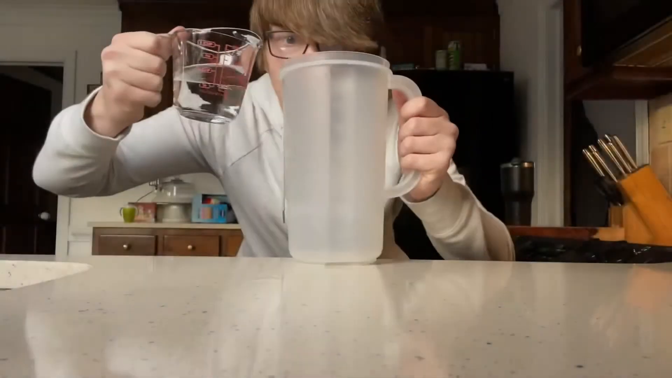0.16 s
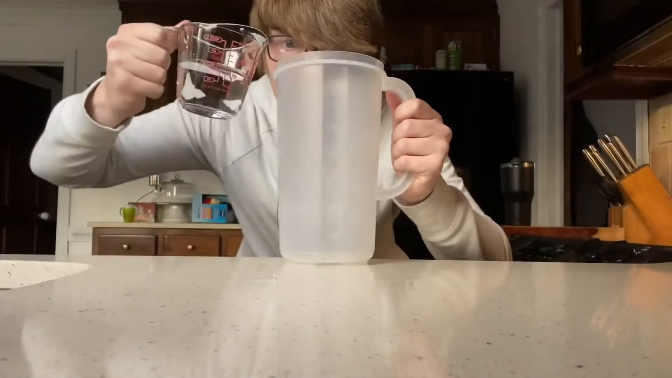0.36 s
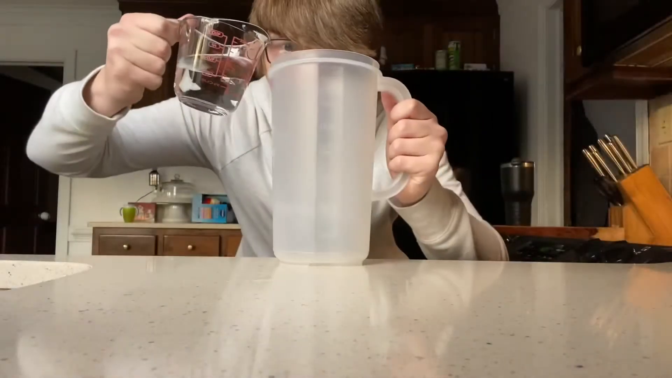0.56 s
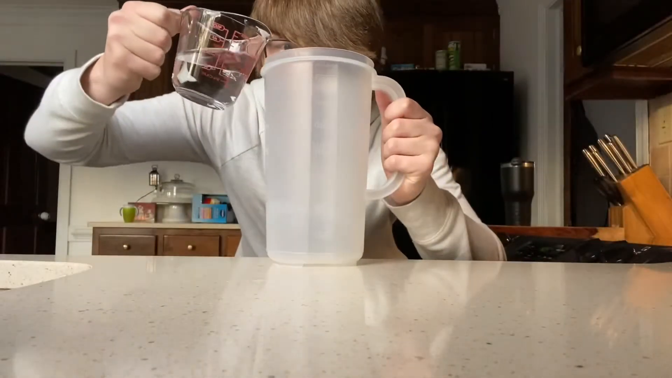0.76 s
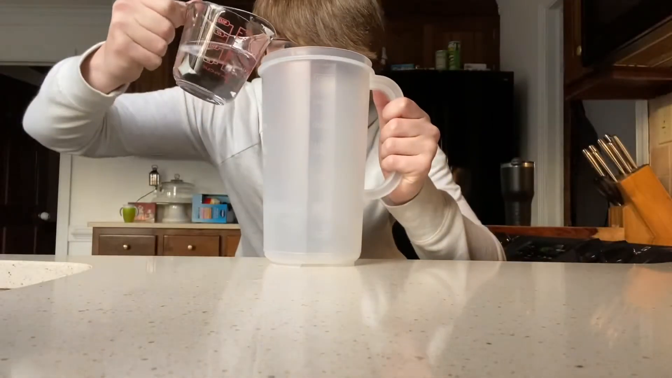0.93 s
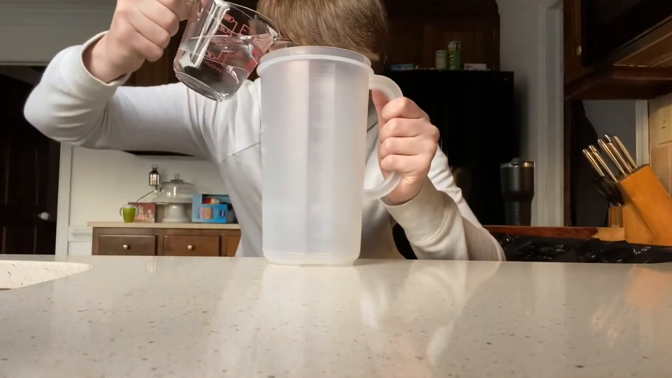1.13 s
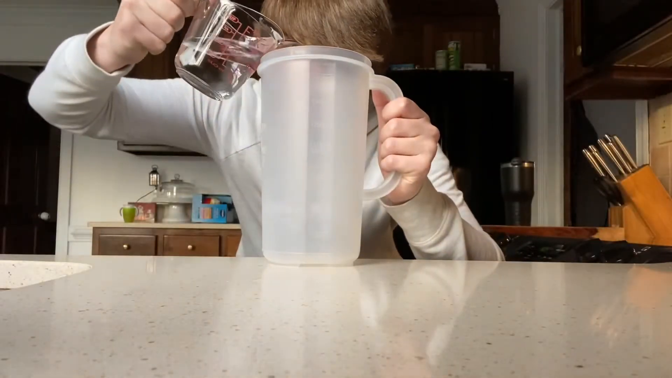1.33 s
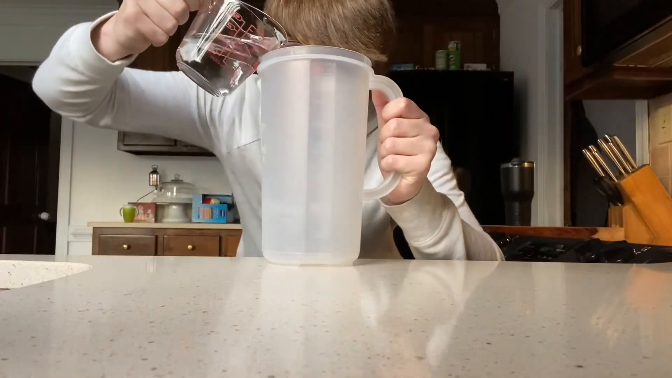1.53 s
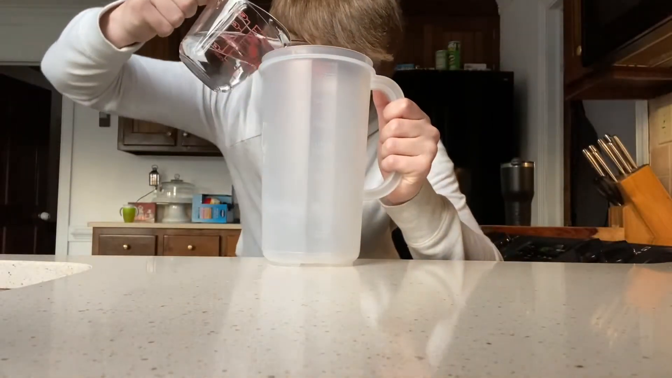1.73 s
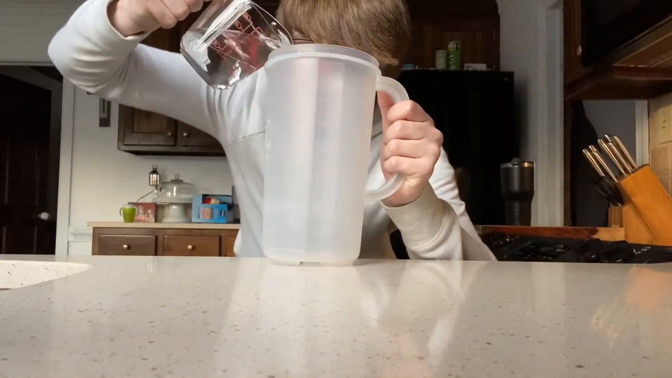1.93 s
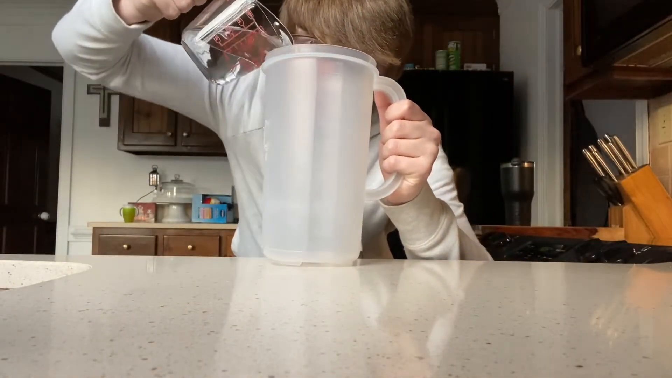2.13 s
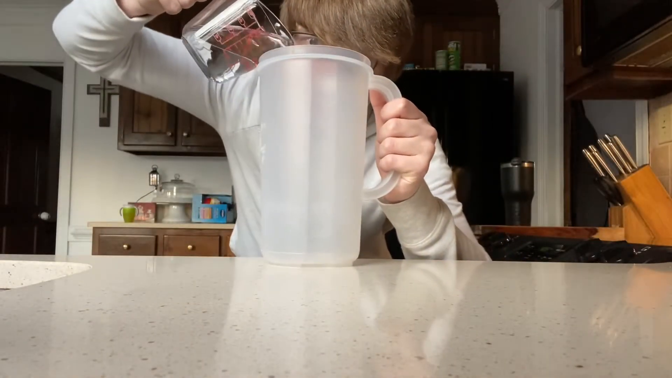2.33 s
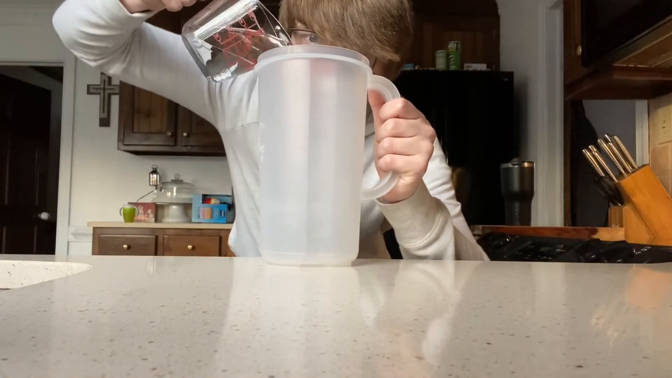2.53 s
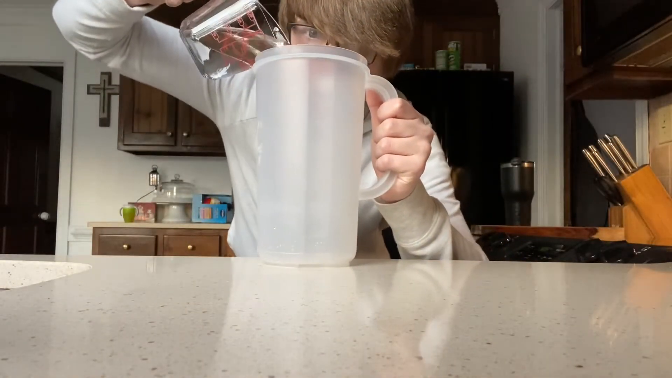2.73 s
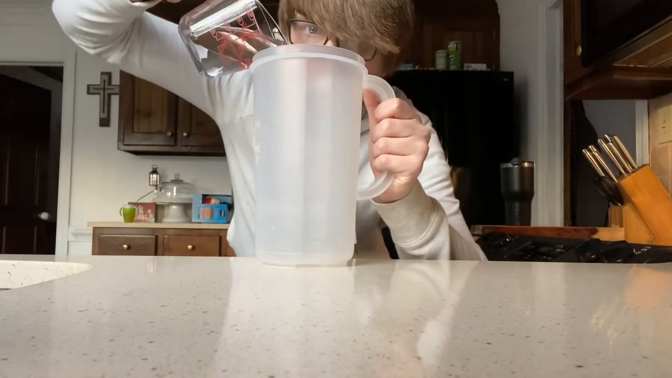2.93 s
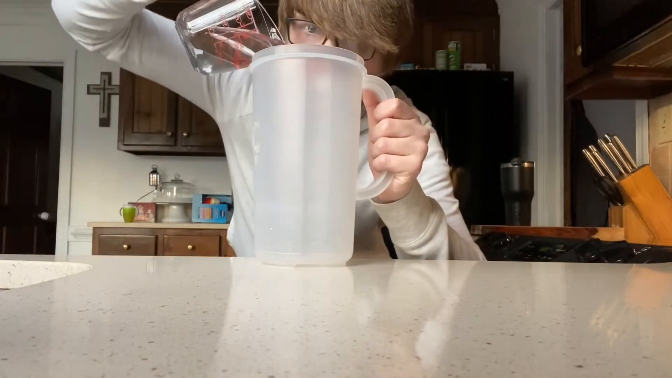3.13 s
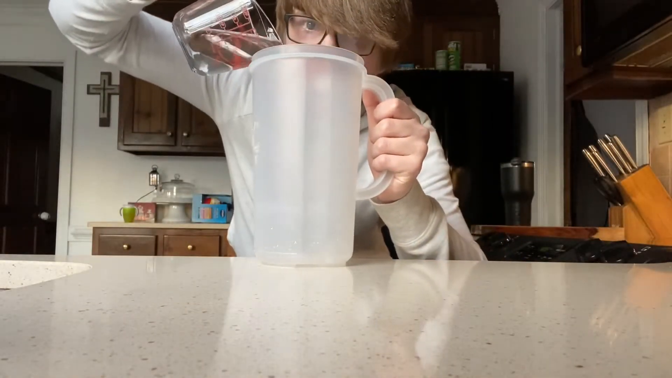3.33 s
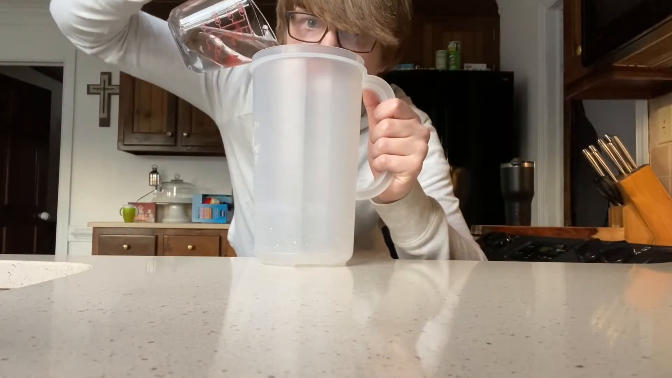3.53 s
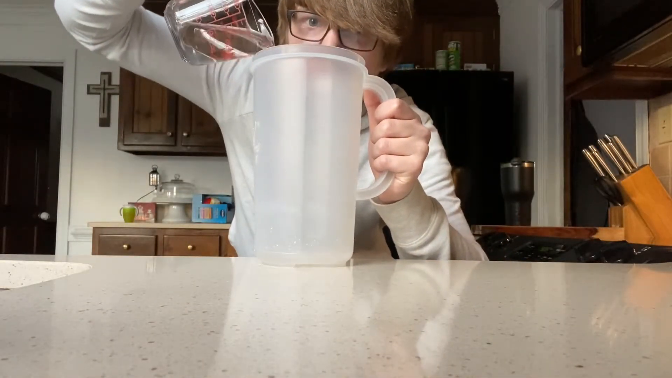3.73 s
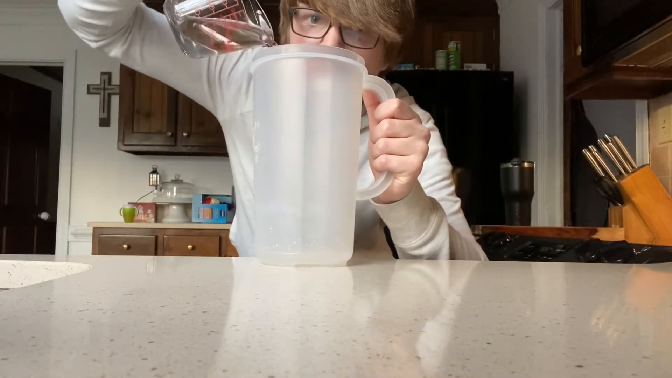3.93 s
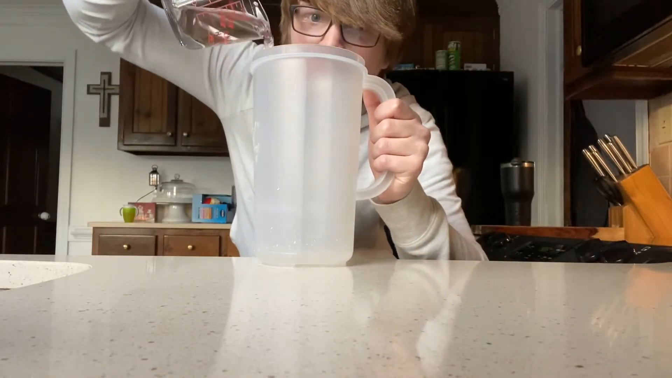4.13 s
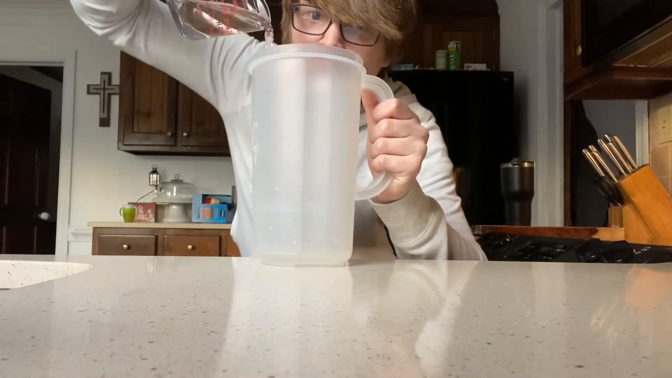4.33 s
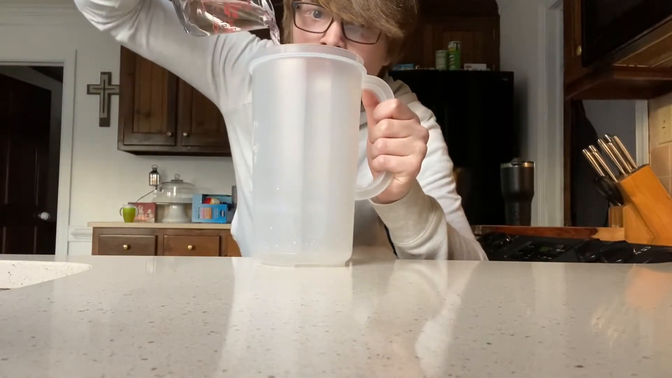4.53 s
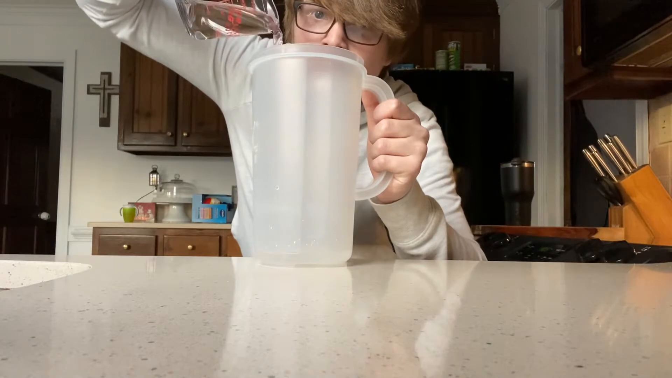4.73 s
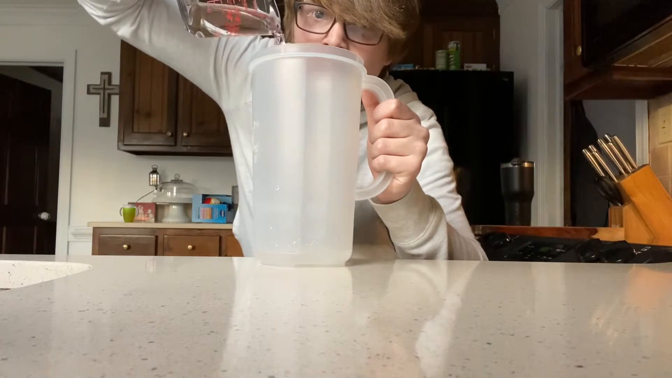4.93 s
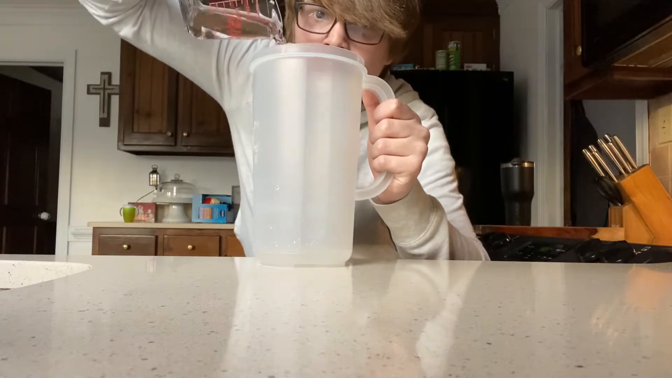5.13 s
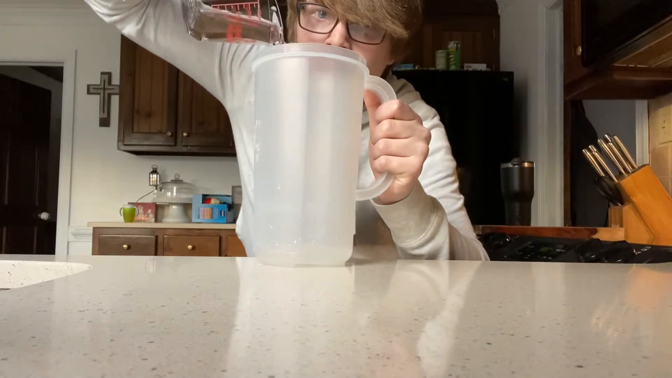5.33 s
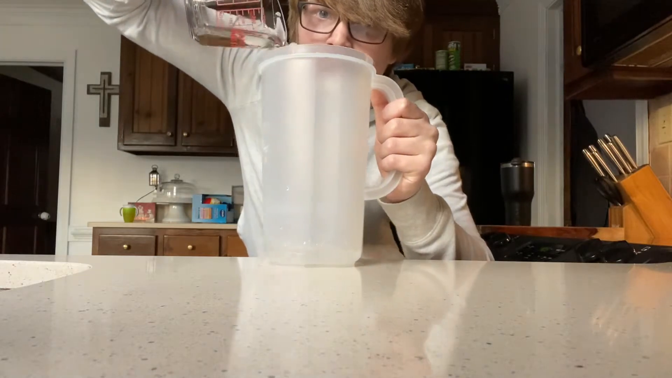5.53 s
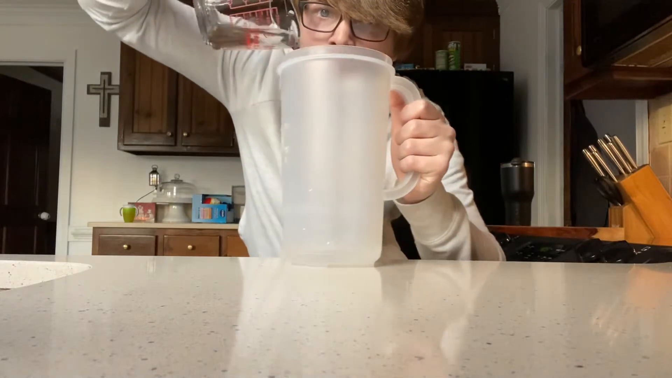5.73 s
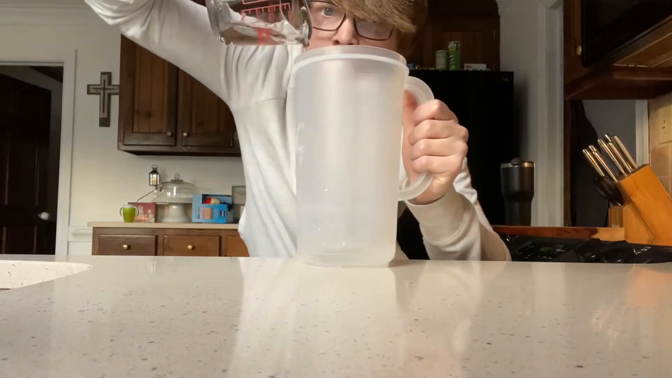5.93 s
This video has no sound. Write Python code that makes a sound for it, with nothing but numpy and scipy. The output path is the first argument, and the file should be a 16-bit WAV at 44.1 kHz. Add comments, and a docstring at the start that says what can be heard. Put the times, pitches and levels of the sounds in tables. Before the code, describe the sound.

Water pours into an empty plastic pitcher, first slapping the dry bottom, then bubbling and splashing hollowly before thinning to drips.

```python
"""Water is poured from a glass cup into a tall plastic pitcher on a kitchen counter, near a two-port microphone.
The kitchen hums throughout and a hollow tone comes and goes; first a sleeve rustles, with faint whistles,
and the cup knocks the pitcher, ringing its air column and bottom. First splats then hit the dry bottom, and the
stream gurgles, sprays and traps bubbles while the air column rises in pitch and the loaded bottom sinks.
Late droplets tick; a diffuse room echo answers the pitcher, its treble part a smooth noisy tail."""
import sys
import numpy as np
from scipy import signal
from scipy.fft import rfft, irfft, next_fast_len
from scipy.io import wavfile
from scipy.ndimage import uniform_filter1d

SR = 44100
rng = np.random.default_rng(int(sys.argv[2]) if len(sys.argv) > 2 else 0)


def file_out(sig):
    """Save sig as 16-bit WAV at sys.argv[1]."""
    # one column per channel
    cols = np.atleast_2d(sig).T
    # limit, then scale
    lim = np.clip(cols, -1, 1)
    pcm = np.round(lim * 32767).astype(np.int16)
    wavfile.write(sys.argv[1], SR, pcm)


N = 263708
TIME_S = np.arange(N) / SR
PORT_SIDES = np.array([[.5], [-.5]])  # left, right share of a left-right difference


def amp(db):
    """Decibels to gain."""
    return 10 ** (np.asarray(db) / 20)


def unit(x):
    """Scaled to rms 1."""
    return x / np.sqrt(np.mean(x ** 2) + 1e-20)


def along(points, hz):
    """(Hz, value) points interpolated on a log frequency axis."""
    f, v = np.transpose(points)
    return np.interp(np.log(hz + 1), np.log(f + 1), v)


def curves(rows, outside=-140):
    """One value per sample for each column after the time."""
    s, *cols = np.transpose(rows)
    return [np.interp(TIME_S, s, c, outside, outside) for c in cols]


def filtered(x, response):
    """x times a complex response of frequency."""
    m = next_fast_len(N + SR // 2)
    return irfft(rfft(x, m) * response(np.fft.rfftfreq(m, 1 / SR)), m)[..., :N]


def band(x, lo_hz, hi_hz):
    """Causal band-pass."""
    return signal.sosfilt(signal.butter(2, [lo_hz, hi_hz], "bandpass", fs=SR, output="sos"), x)


def add(track, s, sound):
    """Mixes a short sound in at time s."""
    part = track[round(s * SR):][:len(sound)]
    part += sound[:len(part)]


def rush(spectrum, alike):
    """Stereo noise of rms 1; mid and side shares set how alike the ports are."""
    def turn(hz):
        return np.arccos(np.clip(along(alike, hz), -1, 1)) / 2

    pair = rng.standard_normal((2, N))
    mid, side = filtered(pair, lambda hz: amp(along(spectrum, hz)) * [np.cos(turn(hz)), np.sin(turn(hz))])
    return unit(np.array([mid + side, mid - side]))


# Rumble spectrum. Each row: frequency in Hz, relative level in dB.
RUMBLE_SPECTRUM = [(15, -40.5), (55, -1), (91, -6), (123, 2.5), (216, -5), (280, -15), (340, -11.5),
                   (485, -6), (700, -17.5), (1200, -24.5), (1700, -33.5), (2150, -30.5), (2450, -32),
                   (2720, -29), (3050, -40), (3600, -44), (8000, -53.5), (13400, -56.5), (14500, -66)]
# Stereo likeness of room noise and cloth. Each row: frequency in Hz, left-right correlation (0 to 1).
PORT_LIKENESS = [(30, .95), (180, .85), (550, .6), (1000, .1), (6000, .2), (8000, .8), (15000, .8)]
# Mains hum. Each row: frequency in Hz, level in dB rms.
MAINS = [(60, -72.5), (120, -67)]
RUMBLE_DB = -52


def kitchen():
    """Appliance rumble as shaped noise, mains hum as steady sines."""
    mains = sum(amp(db) * np.sqrt(2) * np.sin(2 * np.pi * hz * TIME_S) for hz, db in MAINS)
    return amp(RUMBLE_DB) * rush(RUMBLE_SPECTRUM, PORT_LIKENESS) + mains


def droplets(count, spread_db, share):
    """Impulses of unequal size on a share of steady noise, rms 1."""
    when, size = rng.random(count), np.clip(rng.standard_normal(count), -2, 2)
    hits = np.bincount((when * N).astype(int), amp(spread_db * size) * rng.choice([-1, 1], count), N)
    return unit(unit(hits) + share * rng.standard_normal(N))


def hum(hz, width_hz):
    """A narrow resonance whose pitch may move, shaken by random impulses; rms 1."""
    phase = 2 * np.pi * np.cumsum(hz) / SR
    shakes = np.array([droplets(count=1200, spread_db=3.0, share=0.33) for _ in range(2)])
    a, b = filtered(shakes, lambda f: 1 / (1 + 1j * f / width_hz) ** 2)
    return unit(a * np.cos(phase) + b * np.sin(phase))


# Hollow tone of the pitcher. Each row: time in seconds, level in dB.
HOLLOW_LEVEL = [(0.0, -55), (0.17, -59), (0.6, -55.5), (0.77, -63), (2.11, -66), (2.31, -76), (2.43, -42),
                (2.56, -47.5), (2.8, -48), (2.91, -48), (3.21, -40), (3.5, -41), (4.18, -54), (4.41, -77),
                (5.03, -44.5), (5.56, -55.5), (5.71, -59), (5.98, -67)]
HOLLOW_HZ = 344


def hollow():
    """A pitcher resonance of fixed pitch, stirred by hand and water."""
    return amp(curves(HOLLOW_LEVEL)[0]) * hum(np.full(N, HOLLOW_HZ), width_hz=26.6)


# Sleeve strokes. Each row: peak time in seconds, rustle level in dB, hiss level in dB.
SLEEVE_STROKES = [(.15, -65, -100), (.3, -67, -82), (.47, -63.5, -78.5), (.73, -66, -92)]
# Rustle spectrum. Each row: frequency in Hz, relative level in dB.
RUSTLE_SPECTRUM = [(590, -3.5), (1000, -5), (1400, -6.5), (1660, -23.5), (1910, -3), (2640, -6.5),
                   (2900, -9.5), (5000, -26.5), (6500, -51.5), (11000, -120)]
BRUSH_RISE_S, RUSTLE_FALL_S, HISS_FALL_S = 0.047, 0.26, 0.14  # times to change by 10 dB


def sleeve():
    """Cloth brushes as the arm lifts the cup; noise swells quickly and fades with each stroke."""
    def stroke(s, db, fall_s):
        return amp(db - 10 * np.maximum((s - TIME_S) / BRUSH_RISE_S, (TIME_S - s) / fall_s) ** 2)

    rustle = sum(stroke(s, db, RUSTLE_FALL_S) for s, db, _ in SLEEVE_STROKES)
    hiss = sum(stroke(s, db, HISS_FALL_S) for s, _, db in SLEEVE_STROKES)
    uneven = 0.84 + 0.33 * unit(abs(band(rng.standard_normal(N), 3.4, 17.0)))
    hiss_spectrum = [(4000, -24), (5500, 4.5), (7500, 3.0), (10000, -4), (13000, -5), (15000, -39.5)]  # Hz, dB
    treble = rush(hiss_spectrum, PORT_LIKENESS)
    return uneven * (rustle * rush(RUSTLE_SPECTRUM, PORT_LIKENESS) + hiss * treble)


# Thumps on the pitcher. Each row: time in seconds, level in dB before the band-pass, air ring t60 in seconds.
THUMPS = [(0.158, -31, 0.11), (0.187, -33.5, 0.08), (0.259, -25.5, 0.069), (.296, -9, 0.097),
          (.735, -24, 0.059), (1.2492, -9.5, 0.077), (1.428, -28, 0.077), (1.749, -16, 0.079),
          (2.049, -32, 0.22), (2.259, -2, 0.02), (2.276, -2.5, 0.12), (2.29, -2, 0.055), (2.334, -6, 0.11),
          (2.442, -8.5, 0.066), (2.469, -13.5, 0.12), (2.495, -13.5, 0.19), (2.725, -19.5, 0.11),
          (2.759, -14, 0.13), (2.783, -9.5, 0.14), (2.861, -13, 0.077), (2.951, -13, 0.076),
          (3.019, -18.5, 0.058), (3.054, -8.5, 0.046), (3.08, -9, 0.054), (3.151, -7, 0.062),
          (3.165, -15.5, 0.28), (3.178, -11.5, 0.2), (3.254, -13.5, 0.067), (3.302, -36, 0.14),
          (3.339, -18.5, 0.21), (3.388, -19, 0.066), (3.411, -20.5, 0.09), (3.478, -19.5, 0.44),
          (3.515, -18.5, 0.096), (3.566, -17.5, 0.22), (3.601, -13.5, 0.18), (3.645, -22.5, 0.18),
          (3.756, -21.5, 0.16), (3.906, -19.5, 0.19), (3.967, -21, 0.18), (4.009, -23.5, 0.13),
          (4.138, -26, 0.12), (4.197, -30.5, 0.2), (4.249, -24, 0.091), (4.268, -25.5, 0.068),
          (4.314, -33.5, .15), (4.465, -30.5, 0.16), (4.506, -20.5, 0.061), (4.539, -17, 0.076),
          (4.552, -13, 0.084), (4.595, -25.5, 0.17), (4.682, -29, 0.2), (4.77, -14, 0.04),
          (4.818, -24, 0.077), (4.848, -24, 0.12), (4.874, -28, .1), (4.896, -21, 0.12),
          (4.948, -19.5, 0.087), (4.977, -24, 0.17), (5.092, -25, 0.55), (5.247, -20.5, 0.16),
          (5.342, -14, 0.077), (5.453, -18, 0.099), (5.55, -23, 0.077), (5.588, -37, 0.048),
          (5.619, -30, 0.074), (5.691, -23.5, 0.077), (5.74, -27.5, 0.14)]
# Air column, shortened by rising water. Each row: time in seconds, pitch in Hz.
AIR_COLUMN = [(2.2, 347), (2.98, 349.5), (3.2, 368.3), (4.2, 370.7), (5.98, 380.5)]
# Pitcher bottom, sinking in pitch under the water's weight. Each row: time in seconds, pitch in Hz,
# hum level in dB, overtone level in dB, thump ring relative to the air column in dB.
BOTTOM = [(0, 455.4, -84, -85, -14), (2.2, 461, -79, -83, -18.5), (2.298, 454, -52, -67, -1),
          (2.553, 452.3, -77, -76, -0.5), (2.752, 441, -36.5, -62, -15.5), (3.02, 410, -44, -61.5, -18),
          (3.199, 385, -41.5, -55, -16), (3.452, 345, -41, -47.5, -29), (3.65, 304, -38.5, -44.5, -1.5),
          (3.85, 250, -76.5, -88, 11), (4.201, 218.9, -55.5, -64, 3), (4.8, 210.1, -47, -70, 6.5),
          (5.35, 210.7, -45.5, -59, 12.5), (5.98, 207.3, -65, -77, 1)]
# Bottom modes. Each row: pitch ratio, mean level in dB, t60 ratio to the air ring.
BOTTOM_MODES = [(.86, 5.5, 0.52), (0.998, 5.5, 0.2), (1.1, -2.5, 0.087), (1.22, -39, 0.16),
                (1.5, -7.5, 0.084), (1.949, -11.5, 0.12)]


def thumps():
    """Each thump rings the air column and the plastic bottom, every bottom mode at a new strength."""
    out, t = np.zeros(N), np.arange(SR // 3) / SR
    when, pitch, *_, share_db = np.transpose(BOTTOM)
    for s, db, t60 in THUMPS:
        air_hz, bottom_hz = np.interp(s, *np.transpose(AIR_COLUMN)), np.interp(s, when, pitch)
        plastic = 0
        for ratio, level_db, longer in BOTTOM_MODES:
            decay = amp(level_db + 2 * rng.standard_normal() - 60 * t / (t60 * longer))
            plastic = plastic + decay * np.sin(2 * np.pi * bottom_hz * ratio * t)
        air = amp(-60 * t / t60) * np.sin(2 * np.pi * air_hz * t)
        ring = air + amp(np.interp(s, when, share_db)) * plastic
        add(out, s - .0025, amp(db) * ring * (1 - np.exp(-t / 0.0041)))
    for _ in range(3):  # little radiates below the air column's pitch
        out = band(out, 342, 2200)
    return out


# Whistles in the rustle. Each row: start in seconds, length in seconds, start Hz, end Hz, peak level in dB.
STREAKS = [(0.162, 0.079, 2920, 2920, -78), (0.311, 0.033, 2930, 2950, -62.5),
           (.345, 0.054, 2820, 2940, -64.5), (.4, 0.12, 2680, 2570, -66), (0.707, .1, 2510, 2350, -68),
           (.72, 0.083, 2730, 2600, -74)]


def streaks():
    """Faint narrow whistles: sines that glide and waver."""
    out = np.zeros(N)
    for s, length_s, hz, end_hz, db in STREAKS:
        u = np.linspace(0, 1, int(length_s * SR))
        waver = 1 + 0.012 * unit(uniform_filter1d(rng.standard_normal(len(u)), size=300))
        phase = 2 * np.pi * np.cumsum((hz + (end_hz - hz) * u) * waver) / SR
        add(out, s, amp(db) * np.sin(np.pi * u) * np.sin(phase))
    return out


# Pitcher wall and upper air modes. Each row: frequency in Hz, width in Hz, level in dB.
WALL_MODES = [(740, 33, -27.5), (1054, 88, 0.5), (1484, 295, -6.5), (1628, 92, -9), (1830, 75, -11.5),
              (2195, 60, -3), (2870, 73, -15), (3140, 80, -3.5), (4062, 163, -3.5)]
AIR_MODES_BELOW_HZ = 1300  # modes under this belong to the air column


def wall(f, through, rise=1):
    """The pitcher's resonances, of alternating sign, over a flat share; the air modes may be raised."""
    response = through
    for k, (c, w, db) in enumerate(WALL_MODES):
        c = c * rise if c < AIR_MODES_BELOW_HZ else c
        response = response + (-1) ** k * amp(db) * 1j * f * w / (c * c - f * f + 1j * f * w)
    return response


# Splashes and knocks. Each row: time in seconds, then peak levels in dB before the wall filter
# of the 0.5-2.8 kHz, 2.3-5 kHz and 5-12.5 kHz parts.
SPLASHES = [(0.2939, -34.5, -48, -58), (1.2468, -29.5, -54.5, -42), (2.2562, -21, -56, -68),
            (2.2739, -16, -47, -30), (2.2873, -11, -21, -8.5), (2.3322, -6, 0, -11.5),
            (2.4385, -9.5, -17, -9.5), (2.4644, -48, -45, -17), (2.4925, -7.5, -12.5, -6),
            (2.642, -45, -41, -33), (2.703, -47, -39, -34), (2.731, -41, -42, -19),
            (2.7552, -23.5, -44, -13), (2.8462, -45, -28, -42), (2.904, -44, -45, -51),
            (3.072, -19.5, -31, -21), (3.088, -35, -18.5, -43), (3.1755, -16, -30, -48),
            (3.2674, -23, -29, -13), (3.3049, -18, -42, -10.5), (3.3245, -17.5, -17, -43),
            (3.4653, -17.5, -44, -70), (3.596, -17, -18, -11), (3.632, -38, -22, -6),
            (3.6472, -13, -26, -10), (3.721, -24, -32, -45), (3.7814, -43, -43, -45),
            (3.901, -18.5, -25, -24.5), (3.929, -18.5, -44, -11), (3.9853, -15.5, -28, -33),
            (4.0062, -14, -4.5, -4.5), (4.0414, -24, -13, -35), (4.1405, -41, -21, -27),
            (4.199, -15.5, -21, -53), (4.3125, -42, -15, -31), (4.461, -32, -36, -9.5),
            (4.5055, -24.5, -44, -12), (4.5202, -20, -21.5, -29), (4.5943, -21, -22.5, -37),
            (4.7145, -13.5, -41, -16.5), (4.768, -35, -10.5, -11.5), (4.7984, -17.5, -15, -11),
            (4.8952, -18, -15, -47), (4.996, -11, -8, -49), (5.057, -38, -17.5, -16.5),
            (5.139, -12, -16.5, -19.5), (5.168, -20, -24, -35), (5.248, -14.5, -38, -53),
            (5.2967, -33, -18.5, -20), (5.3346, -18, -16, -19), (5.436, -25, -21.5, -35),
            (5.523, -13.5, -14.5, -11), (5.653, -23, -34, -15), (5.685, -26, -29, -38),
            (5.7792, -28, -27, -12), (5.82, -32, -35, -55), (5.9175, -27, -30, -56)]
# Hiss after a slap: t60 in seconds of the low, middle and high part.
HISS_T60_S = (0.033, 0.024, 0.035)


def splashes():
    """A slap of water on water or plastic, then a short hiss, in three bands coloured by the wall."""
    out, t = np.zeros(N), np.arange(SR // 8) / SR
    edges_hz = [(500, 2800), (2300, 5000), (5000, 12500)]
    for s, *parts_db in SPLASHES:
        for (lo, hi), db, t60 in zip(edges_hz, parts_db, HISS_T60_S):
            hiss = 0.11 * rng.standard_normal(len(t)) * amp(-60 * t / t60)
            slap = (t == 0) + 0.33 * rng.choice([-1, 1], len(t)) * amp(-60 * t / 0.0013)
            burst = band(band(slap + hiss, lo, hi), lo, hi)
            add(out, s + .0007, amp(db) * burst / abs(burst).max())
    return filtered(out, lambda f: wall(f, through=0.29))


def bubble(hz, cycles, rise):
    """A trapped air pocket rings and rises in pitch as it nears the surface; negative rise sinks."""
    u = np.arange(int(2.5 * abs(cycles) / hz * SR) + 2) / SR * hz  # cycles elapsed
    tone = np.sin(2 * np.pi * (u + rise * u * u / (2 * cycles)))
    return tone * np.exp(-3 * u / cycles) * (1 - np.exp(-u / 2.6))


# Counter bumps. Each row: start in seconds, level in dB, starting pitch in Hz, life in cycles.
BUMPS = [(1.029, -30, 62.3, 6.4), (1.247, -17, 235, 3.6), (1.738, -34.5, 175, 10), (2.766, -2, 218, 1.96),
         (3.249, -37, 59, 6.6), (4.547, -23, 151, 2.3), (5.332, -26.5, 163, 12.3)]


def bumps():
    """Soft contacts with the counter: a few slow cycles that sink in pitch."""
    out = np.zeros(N)
    for s, db, hz, cycles in BUMPS:
        add(out, s, amp(db) * bubble(hz, cycles, rise=-0.24))
    return out


AIR_RISE, RISE_S = 1.03, (4.34, 5.1)  # final pitch ratio of the air modes; start and end of the climb


def filling(x, through):
    """x through the pitcher, crossfading to raised air modes as it fills."""
    u = np.interp(TIME_S, RISE_S, [0, 1])
    before = filtered(x, lambda f: wall(f, through))
    after = filtered(x, lambda f: wall(f, through, AIR_RISE))
    return (1 - u) * before + u * after


def fizz(count, lo_hz, span, spread_db):
    """Many small bubbles of random pitch, size and life, rms 1."""
    out = np.zeros(N)
    for when, a, b, pitch, life in rng.random((count, 5)):
        ring = bubble(lo_hz * span ** pitch, 4 + 11 * life, rise=0.069)
        add(out, when * N / SR, amp(spread_db * (a + b)) * ring)
    return unit(out)


def patchy(x, depth_db):
    """Random gain in small patches of time and frequency, rms 1."""
    z = signal.stft(x, nperseg=256)[2]
    field = uniform_filter1d(uniform_filter1d(rng.standard_normal(z.shape), size=9, axis=0), size=4, axis=1)
    return unit(signal.istft(z * amp(depth_db * unit(field)), nperseg=256)[1][:N])


# Stream strength. Each row: time in seconds, gurgle drive in dB, spray drive in dB.
STREAM = [(2.25, -55, -63), (2.43, -44, -58.5), (2.58, -55, -62), (2.68, -49.5, -63), (2.78, -48, -59),
          (3.02, -52, -55.5), (3.14, -43.5, -53), (3.5, -44.5, -50.5), (3.86, -42.5, -49),
          (4.05, -47.5, -50), (4.27, -47.5, -48.5), (4.5, -49.5, -55), (4.59, -43.5, -49),
          (4.75, -42.5, -51.5), (5.05, -41, -45.5), (5.3, -41.5, -50.5), (5.45, -43, -47.5),
          (5.68, -45, -50.5), (5.8, -52, -63.5), (5.98, -61.5, -71.5)]
# Spray spectrum. Each row: frequency in Hz, relative level in dB.
SPRAY_SPECTRUM = [(1500, -14), (3000, -6.5), (4300, -2), (5500, -6.5), (8500, 2), (11000, -4), (14000, -5),
                  (16000, -20)]
FULL_DB = -43  # gurgle drive of a full stream
COLUMN_DB, COLUMN_SWING = -44, 1  # drive at full stream; dB of change per dB of gurgle
DEEP_DB, DEEP_SWING = -41.5, 2.06
DEEPENS_DB_PER_S, DEEP_FROM_S = 4.5, 3.97  # deep gurgle grows until the pool is deep enough


def stream():
    """Falling water shakes air column and bottom, fills wall modes with small bubbles and throws spray."""
    bright_db, spray_db = curves(STREAM)
    column_db = COLUMN_DB + COLUMN_SWING * (bright_db - FULL_DB)
    deep_db = DEEP_DB + DEEP_SWING * (bright_db - FULL_DB)
    deep_db += DEEPENS_DB_PER_S * np.minimum(TIME_S - DEEP_FROM_S, 0)

    bottom_hz, bottom_db, overtone_db, _ = curves(BOTTOM)
    column = hum(np.interp(TIME_S, *np.transpose(AIR_COLUMN)), width_hz=29.5)
    column += 0.32 * unit(band(droplets(count=1200, spread_db=8.5, share=0.19), 363, 567))
    bottom = amp(bottom_db) * hum(bottom_hz, width_hz=29)
    bottom += amp(overtone_db) * hum(2.03 * bottom_hz, width_hz=96)

    swirl = filling(droplets(count=3000, spread_db=4.5, share=0.58), through=0.27)
    deep = fizz(count=1600, lo_hz=913, span=2.002, spread_db=10.0)
    bright = fizz(count=1600, lo_hz=1640, span=2.2, spread_db=4)
    small = filling(amp(deep_db) * deep + amp(bright_db) * bright, through=0.26)
    wash = amp(deep_db - 4.0) * unit(band(swirl, 710, 2300))
    wash += amp(bright_db - 18) * unit(band(swirl, 1900, 3540))

    # the stream breaks up: spray and gurgle leap together
    surge = filtered(droplets(count=350, spread_db=1.0, share=0.099) ** 2, lambda hz: 1 / (1 + 1j * hz / 22))
    leap = unit(np.sqrt(abs(surge)))
    gurgle = (0.43 + 0.26 * leap) * (amp(5) * small + wash)
    mist = patchy(droplets(count=4000, spread_db=30.5, share=1.8), depth_db=5.5) * (0.5 + 0.61 * leap)
    spray = amp(spray_db) * unit(filtered(mist, lambda hz: amp(along(SPRAY_SPECTRUM, hz))))

    # the finest bubbles burst, drops tick on the surface
    crackle = amp(spray_db - 21.0) * fizz(count=2000, lo_hz=3070, span=1.92, spread_db=9)
    patter = unit(band(droplets(count=1500, spread_db=17, share=0.055), 3000, 7000))
    crackle += amp(spray_db - 7.5) * unit(filtered(patter, lambda f: wall(f, through=0.67)))
    return amp(column_db) * column + bottom + gurgle + spray + crackle


# Large bubbles. Each row: time in seconds, relative level in dB, starting pitch in Hz.
BUBBLES = [(2.622, -34, 1380), (2.643, -31.5, 2210), (2.686, -36, 2230), (2.705, -32, 1460),
           (2.755, -20.5, 2870), (2.857, -36, 2210), (2.892, -32, 1930), (2.903, -26.5, 2540),
           (3.034, -24, 2260), (3.038, -20.5, 1900), (3.043, -23.5, 1370), (3.068, -22.5, 2210),
           (3.082, -27.5, 1320), (3.154, -22.5, 2440), (3.187, -28, 1210), (3.121, -20.5, 1410),
           (3.175, -22, 755), (3.233, -23, 2270), (3.263, -23, 2180), (3.304, -22, 1810),
           (3.326, -20.5, 3150), (3.363, -22, 2470), (3.433, -25, 2100), (3.451, -27.5, 1240),
           (3.468, -24, 2270), (3.509, -31.5, 1780), (3.597, -29.5, 890), (3.607, -21.5, 1590),
           (3.647, -20.5, 1044), (3.725, -26, 1070), (3.755, -21.5, 1080), (3.814, -24.5, 1550),
           (3.86, -24, 1460), (3.898, -34, 1570), (3.988, -15.5, 1043), (4.064, -19.5, 1187),
           (4.165, -35, 1055), (4.197, -29, 1026), (4.248, -25.5, 1090), (4.268, -29.5, 1034),
           (4.307, -20.5, 1150), (4.339, -42, 1110), (4.362, -26, 1420), (4.4095, -35.5, 1020),
           (4.4656, -26.5, 2850), (4.5048, -27.5, 2060), (4.54, -20, 1430), (4.551, -14, 1403),
           (4.574, -22.5, 1053), (4.595, -16, 1550), (4.664, -22.5, 1890), (4.681, -19.5, 1026),
           (4.718, -17.5, 1102), (4.745, -27, 1174), (4.77, -13, 1475), (4.798, -20, 1095),
           (4.849, -20, 1080), (4.895, -21, 1407), (4.932, -19.5, 1070), (4.957, -15, 1400),
           (4.999, -27, 1060), (5.139, -18, 1110), (5.167, -19.5, 1026), (5.215, -20, 1155),
           (5.232, -16, 1060), (5.297, -22.5, 1260), (5.369, -21.5, 1760), (5.436, -22, 1032),
           (5.509, -11, 1151), (5.54, -18.5, 1090), (5.55, -20, 1107), (5.616, -24, 1690),
           (5.661, -23.5, 1403), (5.757, -24.5, 1160), (5.767, -19.5, 1103), (5.776, -35, 1104)]
# Bubbles whose pitch rises strongly. Each row: start in seconds, level in dB, starting pitch in Hz,
# life in cycles, share of pitch rise over that life.
RISING_BUBBLES = [(2.974, -37, 1120, 22, 0.2), (3.225, -24, 1230, 13, 0.65),
                  (3.783, -15.5, 1075, 8.2, 0.45)]
BUBBLE_CYCLES = 12.85  # mean life
BUBBLE_RAGGED = 0.33  # rms share of uneven loudness


def bubbles():
    """Large air pockets, one by one: a small noise splat with an uneven ring; a few rise strongly."""
    def ragged(ring):
        return ring * (1 + BUBBLE_RAGGED * unit(uniform_filter1d(rng.standard_normal(len(ring)), size=50)))

    out = np.zeros(N)
    for (s, db, hz), longer in zip(BUBBLES, rng.uniform(.7, 1.3, len(BUBBLES))):
        ring = bubble(hz, BUBBLE_CYCLES * longer, rise=0.026)
        fade = amp(-60 * np.arange(len(ring)) / SR / 0.0071)
        splat = band(rng.standard_normal(len(ring)), .8 * hz, 5500) * fade
        add(out, s - .0006, amp(db - 1) * (ragged(ring) + 0.22 * splat))
    for s, db, *shape in RISING_BUBBLES:
        add(out, s, amp(db) * ragged(bubble(*shape)))
    return out


# Droplets on water or wall. Each row: time in seconds, relative body level in dB, pitch in Hz,
# relative click level in dB.
TICKS = [(3.0285, -30, 2610, -58), (3.152, -39, 2600, -67), (3.4785, -28, 2800, -55),
         (3.534, -28.5, 2633, -37), (3.5723, -28, 2580, -33), (3.7554, -46.5, 2670, -41),
         (3.8124, -47, 2630, -54), (4.1689, -21, 5046, -42), (4.2494, -35, 5660, -50),
         (4.372, -25.5, 4200, -41), (4.416, -36, 3240, -35), (4.5397, -38, 4380, -40.5),
         (4.5504, -31, 2870, -34.5), (4.571, -28, 3000, -34.5), (4.6209, -31, 2860, -50.5),
         (4.6633, -32, 3205, -56), (4.6803, -28, 4400, -57), (4.7387, -31, 2850, -35),
         (4.8174, -42, 2926, -46), (4.8464, -28, 2870, -34), (4.8768, -29, 2892, -53),
         (4.9436, -28.5, 3148, -53), (4.9732, -33, 3080, -35.5), (5.221, -27, 2850, -72),
         (5.3004, -28, 2870, -49), (5.3732, -31, 2920, -32), (5.685, -31, 2670, -57),
         (5.766, -42, 2648, -42)]
TICK_DB, TICK_TREBLE_DB = -7.5, 0.5  # gains on the table's body and click levels
TICK_CYCLES, TICK_TREBLE_HZ = 25, 8100  # body life; mean click pitch


def ticks():
    """Each droplet: a decaying ring at its pitch and a sharper click above."""
    out, t = np.zeros(N), np.arange(SR // 50) / SR
    for (s, db, hz, treble_db), spread in zip(TICKS, rng.uniform(.9, 1.1, len(TICKS))):
        body = np.sin(2 * np.pi * hz * t) * np.exp(-3 * t * hz / TICK_CYCLES)
        click = np.sin(2 * np.pi * TICK_TREBLE_HZ * spread * t) * amp(-60 * t / 0.015)
        add(out, s - .0005, amp(db + TICK_DB) * body + amp(treble_db + TICK_TREBLE_DB) * click)
    return out


# Room decay. Each row: frequency in Hz, t60 in seconds.
ECHO_T60 = [(200, 0.23), (1500, 0.33), (5000, 0.13), (14000, 0.27)]
# Echo gain. Each row: frequency in Hz, gain in dB.
ECHO_GAIN = [(200, -14), (700, -1), (1200, -7.5), (2200, -2.5), (3300, 0), (4300, -2), (5200, 2),
             (6500, 1.5), (8500, -11), (15000, -23)]
NOISE_TAIL_HZ = 3600  # above this the echo is a diffuse noise tail


def echo(x):
    """Diffuse answer of the room, unlike at each port; each frequency dies at its own speed."""
    hz, t, z = signal.stft(rng.standard_normal((2, SR // 2)), SR, nperseg=256)
    t60 = along(ECHO_T60, hz)
    tail = signal.istft(z * amp(-60 * t / t60[:, None]), SR, nperseg=256)[1]
    delayed = np.pad(x, (150, 0))[None]  # samples
    convolved = signal.fftconvolve(delayed, tail / np.linalg.norm(tail[0]), axes=1)[:, :N]

    # fresh noise follows the decaying energy of each frequency
    z = signal.stft(x, SR, nperseg=256)[2]
    keep = amp(-120 * t[1] / t60)  # energy left after one frame
    energy = np.array([signal.lfilter([0, 1 - k], [1, -k], row) for k, row in zip(keep, abs(z) ** 2)])
    noise = signal.stft(rng.standard_normal((2, N)), nperseg=256)[2]
    carrier = unit(abs(noise)) * np.exp(1j * np.angle(noise))
    noisy = signal.istft(carrier * np.sqrt(energy), nperseg=256)[1][:, :N]

    low = filtered(convolved, lambda f: amp(along(ECHO_GAIN, f)) / np.sqrt(1 + (f / NOISE_TAIL_HZ) ** 8))
    high = filtered(noisy, lambda f: amp(along(ECHO_GAIN, f)) / np.sqrt(1 + (NOISE_TAIL_HZ / (f + 1)) ** 8))
    return low + high


# Stereo balance of the direct pitcher sound. Each row: frequency in Hz, left minus right in dB.
PORT_LEAN = [(60, -27.5), (130, -5.5), (290, -3.5), (640, -6), (1410, 1.5), (3100, 7), (6820, 2),
             (15000, -1.5)]
SLAP_ECHO_DB = -4.5  # slaps stir the room less than the stream


def scene():
    """The pitcher, its echo, the contacts around it and the kitchen."""
    slaps = splashes() + ticks()
    body = thumps() + bubbles() + stream() + hollow()
    near = filtered(body + slaps, lambda hz: amp(PORT_SIDES * along(PORT_LEAN, hz)))
    room = echo(body + amp(SLAP_ECHO_DB) * slaps)
    return near + room + bumps() + sleeve() + streaks() + kitchen()


# Path difference of the ports. Each row: frequency in Hz, left port's phase lead in radians.
PORT_LEAD = [(0, 0), (430, -.25), (860, .4), (1400, .4), (1750, -.8), (2200, -1), (3150, 0), (3500, 2.8),
             (4000, 3.3), (4300, 5), (5000, 3.7), (5800, 3.3), (8270, 6.5), (9820, 9), (12100, 11),
             (14600, 14.6), (15500, 15.7)]
TOP_HZ = 16400  # band limit


def record(dry):
    """Sound reaches the two ports by unequal paths; nothing is kept above the band limit."""
    def response(hz):
        lead_rad = np.interp(hz, *np.transpose(PORT_LEAD))
        return np.exp(1j * PORT_SIDES * lead_rad) * (hz < TOP_HZ)

    return filtered(dry, response)


dry = scene()
out = record(dry)
file_out(out)
```